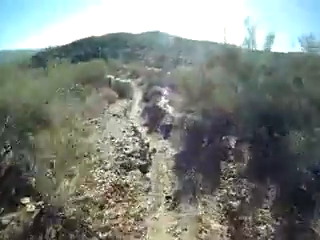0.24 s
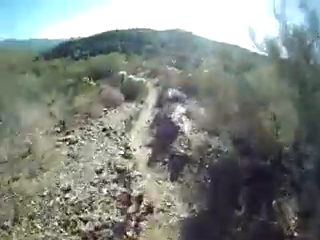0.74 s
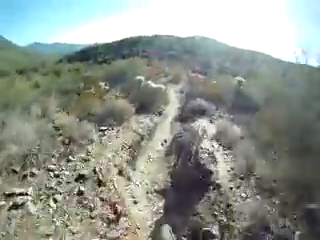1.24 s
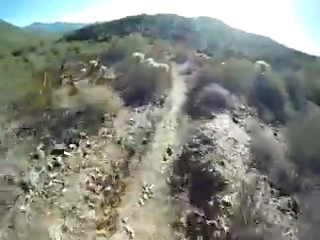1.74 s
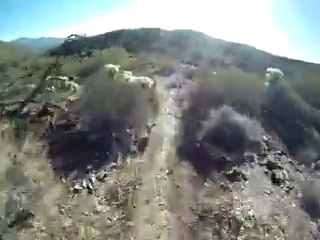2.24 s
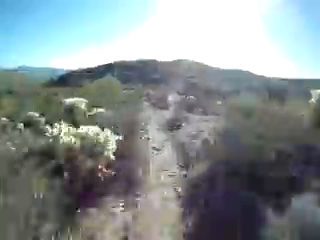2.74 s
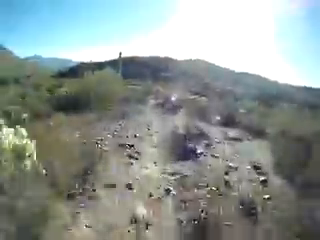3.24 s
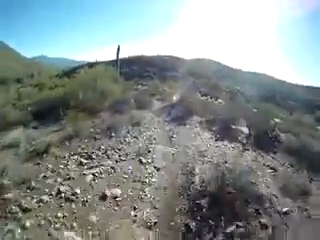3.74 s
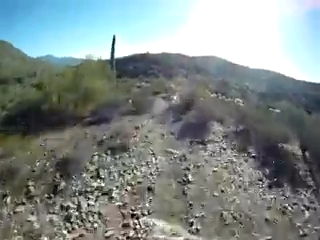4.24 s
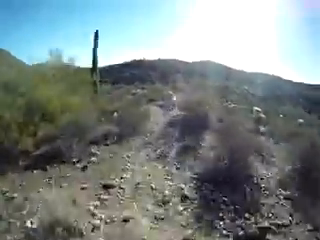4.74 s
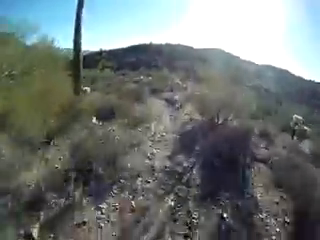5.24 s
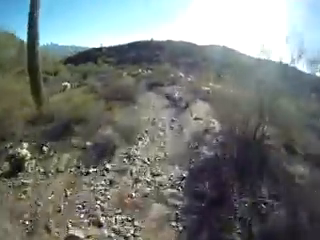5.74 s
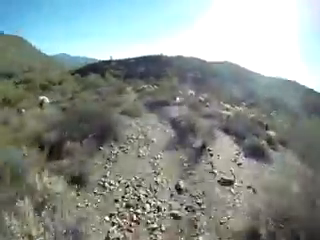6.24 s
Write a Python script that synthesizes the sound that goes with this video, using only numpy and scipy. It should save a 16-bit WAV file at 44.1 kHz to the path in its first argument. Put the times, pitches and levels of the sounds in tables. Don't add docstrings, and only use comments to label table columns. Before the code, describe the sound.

From inside a hard plastic camera case, a bike jolts along a rocky desert trail. Two heavy, boxy slams hit at about 0.1 and 0.3 s with low thumps and rumble, followed by a gritty scrape at 0.4 and clustered rattles at 0.8-0.9. Single hollow clacks come around 1.15-1.25, with dull scraping near 1.3 and a stronger knock and rub at 1.6. Lighter clacks follow at 2.1, 2.3 and 2.6, then only faint crunch and muffled rumble until 3.4. Knocks return at 3.6 and 3.8, with scrapes and bumps near 4.2. From 4.6 to 5.1 comes the most violent burst: overlapping slams, grinding and deep thuds, peaking at 4.9. Smaller scrapes and taps continue at 5.3-5.9, then dense, bright grinding and knocks from 6.0 to the end at 6.5. Everything is close, dry, crushed and grainy, briefly ducking after overloads.

```python
import sys
import numpy as np
from scipy import signal
from scipy.fft import rfft, irfft
from scipy.io import wavfile
from scipy.ndimage import uniform_filter1d, minimum_filter1d

SR = 44100
rng = np.random.default_rng(int(sys.argv[2]) if len(sys.argv) > 2 else 0)


def pcm_store(signal):
    levels = np.round(np.clip(np.atleast_2d(signal), -1, 1) * 32767)
    wavfile.write(sys.argv[1], SR, levels.astype(np.int16).T)


def volts(x):
    e = np.asarray(x, float) / 20
    return 10 ** e


N = 286209


def evened(x):
    return x / np.sqrt(np.mean(x ** 2) + 1e-20)


def lumps(seconds, depth_db):
    span = max(int(seconds * SR), 1)
    drift = uniform_filter1d(uniform_filter1d(rng.standard_normal(N), span), span)
    return volts(depth_db * evened(drift))


def coloured(points):
    f, db = np.transpose(points)
    hz = np.fft.rfftfreq(N, 1 / SR)
    gain = volts(np.interp(np.log(hz + 1), np.log(f + 1), db, left=-100, right=-100))
    return evened(irfft(rfft(rng.standard_normal(N)) * gain, N))


def ring(modes):
    t = np.arange(1500) / SR
    tap = 0
    for hz, width, db in modes:
        tap = tap + volts(db) * np.exp(-np.pi * width * t) * np.sin(2 * np.pi * hz * t)
    tap = signal.lfilter(*signal.butter(3, .75 * modes[0][0], "high", fs=SR), tap)
    return tap / abs(tap).max()


def grit(modes, per_s):
    taps = (rng.random(N) < per_s / SR) * rng.standard_normal(N)
    taps = taps * volts(2.5 * np.minimum(rng.exponential(1, N), 4))
    taps = taps * lumps(.008, 3.5)
    return evened(signal.oaconvolve(taps, ring(modes))[:N])


# (time [s], trail roughness [dB], wind buffeting [dB])
RIDE = [(0.0, -32.5, -10.5), (0.22, -43, -43), (0.25, -43, -23), (0.54, -44.5, -32), (1.53, -51.5, -40),
        (1.63, -55.5, -30.5), (2.02, -43, -32.5), (3.07, -48.5, -35.5), (3.13, -46, -46.5),
        (3.61, -44.5, -25.5), (3.69, -41.5, -38.5), (4.17, -37.5, -25.5), (4.54, -48.5, -40.5),
        (4.64, -47.5, -28), (4.84, -35.5, -25), (5.77, -41, -27.5), (6.27, -36, -22.5), (6.49, -30, -34.5)]
ROUGHNESS, BUFFETING = 1, 2


def ride(column, db, follows):
    rows = np.array(RIDE)
    control_db = np.interp(np.arange(N) / SR, rows[:, 0], rows[:, column])
    return volts(db + follows * (control_db + 44))


# (frequency [Hz], density [dB per Hz])
GUST = [(8.8, -30.5), (15, -1.5), (32, -9), (40, -3.5), (43, -17.5), (59, -19), (200, -38.5), (260, -49),
        (440, -120)]
# (frequency [Hz], density [dB per Hz])
SHUDDER = [(35, -112), (60, -10), (231, -11), (281, -12), (344, -16.5), (500, -17), (650, -43),
           (1100, -120)]


def rumble(wind_gain, shudder_gain):
    wind = evened(coloured(GUST) * lumps(.03, 2.5))
    shudder = evened(coloured(SHUDDER) * lumps(.015, 5))
    return wind_gain * wind + shudder_gain * shudder


# (frequency [Hz], width [Hz], level [dB])
TREAD = [(1980, 1500, -6), (2540, 500, 4.5)]


def tread():
    return ride(ROUGHNESS, -55.5, .6) * grit(TREAD, per_s=6000)


# (frequency [Hz], width [Hz], level [dB])
WALL = [(906, 430, 13.5), (1020, 280, 5), (1161, 180, 12.5), (1376, 340, 6.5)]
# (frequency [Hz], width [Hz], level [dB])
LID = [(1860, 400, 29), (2125, 99, 21), (2340, 96, -39.5)]
# (frequency [Hz], width [Hz], level [dB])
LATCH = [(2748, 120, -6.5), (3569, 240, 9), (4320, 400, 2), (4985, 540, 1.5), (5130, 230, -15)]


def crunch(body_gain, grit_gain):
    body = grit(WALL, per_s=5000) + volts(-1.0) * grit(LID, per_s=3500)
    return body_gain * evened(body) + grit_gain * grit(LATCH, per_s=4400)


# (time [s], peak [dB], pitch [Hz], length [s])
BUMPS = [(0.093, -8, 61, 0.0036), (0.272, -14.5, 33.3, 0.019), (0.584, -24.5, 87, 0.014),
         (0.809, -10, 46.7, 0.0089), (1.125, -21.5, 73, 0.023), (1.306, -30.5, 93, 0.034),
         (1.629, -11, 55.5, 0.012), (2.119, -17.5, 29.8, 0.011), (2.359, -20.5, 55, 0.018),
         (3.571, -17.5, 48, 0.03), (4.032, -15, 36.2, 0.011), (4.182, -10, 37.6, 0.012),
         (4.399, -25.5, 78.5, 0.026), (4.647, -7, 47.8, 0.022), (4.779, -1, 87.5, 0.005),
         (4.846, -2.5, 34.9, 0.019), (5.035, -12.5, 47.4, 0.017), (5.32, -7.5, 63, 0.013),
         (6.069, -17.5, 145.4, 0.017), (6.17, -16.5, 70.3, 0.036), (6.227, -10, 33.3, 0.013)]


def bumps():
    out = np.zeros(N + 4000)
    t = np.arange(4000) / SR
    for s, db, hz, length in BUMPS:
        u = t / np.clip(length, .003, .03)
        swing = u * np.exp(1 - u) * np.sin(2 * np.pi * hz * t * (1 - 1.8 * t))
        at = round(s * SR)
        out[at:at + 4000] += volts(db - 5.0) * swing
    return out[:N]


# (time [s], peak [dB], length [s])
DRAGS = [(0.086, -18.5, 0.022), (0.217, -9.5, 0.034), (.282, -8.5, 0.014), (0.585, -18.5, 0.025),
         (0.862, -13, 0.018), (0.885, -8.5, 0.016), (1.054, -27, 0.084), (1.312, -8, 0.029),
         (1.361, -10, 0.018), (1.581, -5.5, 0.034), (1.65, -8, 0.061), (1.842, -10, 0.02),
         (1.876, -16.5, 0.041), (2.167, -20.5, 0.013), (2.34, -26, 0.031), (2.376, -17, 0.022),
         (2.619, -12.5, 0.028), (3.487, -18, 0.019), (3.595, -5, 0.016), (3.889, -11, 0.012),
         (4.019, -13.5, 0.012), (4.407, -13.5, 0.044), (4.632, -10, 0.0046), (4.711, 0.5, 0.031),
         (5.206, -7.5, 0.0096), (5.369, -15.5, .044), (5.512, -9.5, .017), (5.815, -12.5, 0.019),
         (6.079, -1, 0.032), (6.348, -12, 0.033)]
# (time [s], peak [dB], length [s], sand [dB])
GRINDS = [(0.339, -13, 0.034, -12), (0.412, -5, 0.027, -17), (.811, -6, 0.025, -5),
          (.821, -10.5, 0.012, 3.5), (.977, -24.5, 0.042, -15), (1.545, -18, .018, 1.5),
          (1.629, -13.5, 0.033, -15.5), (2.08, -27, 0.017, -11.5), (2.46, -34, 0.028, -11),
          (2.709, -31.5, 0.051, -4), (3.392, -16, 0.072, -8.5), (3.564, -16, 0.022, -13),
          (3.61, -11, 0.016, 4), (4.174, -17, 0.034, -14), (4.231, -11.5, 0.025, -6.5),
          (4.642, -3, 0.032, -4.5), (4.783, -7, 0.018, -1.5), (4.846, -5.5, 0.029, -7),
          (4.966, -13.5, 0.026, -11.5), (5.04, -7.5, .026, -18), (5.083, -5, 0.017, -10.5),
          (5.321, -10, 0.03, -4), (5.664, -19.5, 0.041, -17), (5.88, -11, 0.036, -3.5),
          (6.029, -10, 0.04, -7.5), (6.142, -6.5, 0.04, -8), (6.217, 1, 0.041, -13.5),
          (6.284, -7, 0.028, -6), (6.433, -2.8, 0.021, -6), (6.472, -16, 0.0062, 4)]


def drag():
    gains = np.zeros((2, N + 5000))
    lead_s = .006
    t = np.arange(5000) / SR - lead_s
    dull = [(*row, -19) for row in DRAGS]
    for s, db, length, sand_db in dull + list(GRINDS):
        side_s = np.where(t < 0, .003, np.clip(length, .006, .05))
        shape = np.exp(-(t / side_s) ** 2)
        at = round((s - lead_s) * SR)
        gains[:, at:at + 5000] += volts(db - 15.0 + np.array([[0], [sand_db]])) * shape
    return gains[:, :N]


# (frequency [Hz], width [Hz], level [dB])
THUD = [(98, 140, 7), (242.4, 120, -8.5), (419, 130, -9.5)]
# (time [s], strength [dB], lean from wall to lid [dB])
SLAMS = [(.102, -1, -0.5), (.291, -4.5, -4.8), (.629, -16, -5), (.812, -15, -3.5), (.882, -12, -2.5),
         (1.139, -12.5, 4), (1.252, -12, 4.5), (1.583, -7, 7), (2.125, -9, 5.5), (2.268, -10.5, 8.5),
         (2.615, -11, 5), (3.379, -11, 5.5), (3.604, -11, 5), (3.831, -10.5, 6), (4.612, -12, 9),
         (4.653, -5.5, -5.5), (4.718, -10.5, 10.5), (4.786, -5, -2.5), (4.843, -9, -8.5), (4.852, -14, 3),
         (4.894, 1.5, -3), (5.14, -19, -5), (5.515, -17.5, 5.5), (5.82, -20.5, 3), (6.038, -12, -5.5),
         (6.088, -24.5, 11.5), (6.217, -14.5, -0.5), (6.224, -9.5, 3.5), (6.293, -10.5, -1), (6.436, -7, 1)]
# (time [s], strength [dB], lean from wall to lid [dB])
TAPS = [(.221, -17, -10), (.399, -19.5, -3), (.621, -34, 2), (2.243, -36, 6), (1.174, -27, -4.5),
        (1.323, -33, 8.5), (1.365, -17.5, 0), (1.568, -24, 5), (1.633, -12, -16), (1.855, -29, -16),
        (2.019, -29, -11), (2.167, -27, -3.5), (2.475, -29, -6), (2.567, -29, -2), (3.417, -24.5, -2.5),
        (4.006, -25.5, -6), (4.105, -18, -13), (4.126, -23, 1), (4.186, -34, 6.5), (4.254, -23.5, -2.5),
        (4.344, -31.5, -1), (4.41, -19.5, -6.5), (4.964, -43, -2), (5.046, -20, -11), (5.208, -19.5, -36),
        (5.328, -20, -14), (5.365, -14.5, -7), (5.587, -43, 17), (5.883, -14, -32), (6.36, -22.5, 8)]
# (time [s], strength [dB], lean from wall to lid [dB])
TICKS = [(.175, -43, 11), (.19, -35.5, 8), (.348, -28.5, 5), (.418, -29.5, -3), (.437, -21.5, -1),
         (.587, -32.5, -3), (.826, -25, 8), (1.657, -15.5, -9), (1.667, -19.5, 4), (2.087, -31, -2),
         (2.14, -32.5, 13), (2.491, -38, 11), (2.656, -21.5, 0), (3.389, -29.5, 2), (3.702, -28, 6),
         (3.841, -25.5, 6.5), (3.878, -24, 4.5), (4.444, -25.5, -3.5), (4.97, -27, 9), (5.079, -24.5, -7),
         (5.09, -19, 2.5), (5.242, -55, 15), (5.384, -21.5, -0.5), (5.661, -31.5, -3), (5.67, -46, -15),
         (5.828, -41, 8.5), (5.935, -25.5, 4), (6.045, -25, 8.5), (6.154, -18.5, -1.5), (6.238, -46, 11)]


def knocks():
    # (latch share [dB], chatter length [s])
    kinds = [(SLAMS, (-10.5, 0.0039)), (TAPS, (-3.5, 0.0044)), (TICKS, (6.7, 0.0044))]
    rows = [tuple(row) + kind for table, kind in kinds for row in table]
    blows, pushes = np.zeros((3, N + 2000)), np.zeros(N)
    lead_s = .002
    t = np.arange(2000) / SR - lead_s
    for s, peak_db, lean_db, latch_db, length in rows:
        rough = rng.standard_normal((4, 2000))
        share_db = np.array([0, lean_db, latch_db + lean_db / 2])
        dying = (t / np.clip(length, .0003, .008)) ** 2
        swell = np.exp(np.where(t < 0, t / .0006, -dying))
        uneven = volts(3.5 * evened(uniform_filter1d(rough[3], 70)))
        chatter = .22 * rough[:3] * swell * uneven
        chatter[:, 88:94] -= 1.2 * np.hanning(6)
        chatter /= np.sqrt(np.sum(chatter[:, :350] ** 2, axis=1, keepdims=True))
        at = round((s - lead_s) * SR)
        blows[:, at:at + 2000] += volts(peak_db + 7.0 + share_db)[:, None] * chatter
        pushes[at] = volts(peak_db - 7.0 + 3.9 * rough[3, 0])
    rung = sum(signal.oaconvolve(blow, ring(part))[:N] for blow, part in zip(blows, (WALL, LID, LATCH)))
    thud = uniform_filter1d(signal.oaconvolve(pushes, ring(THUD))[:N], 40)
    return rung + thud


def scene():
    body, sharp = drag()
    shudder_gain = ride(ROUGHNESS, -48.5, 1) + volts(-7.0) * body
    shake = volts(-4) * uniform_filter1d(body, int(.04 * SR))
    wind_gain = ride(BUFFETING, -44.5, 0.87) + shake
    body_gain = ride(ROUGHNESS, -44, 0.96) + body
    grit_gain = ride(ROUGHNESS, -58, 0.91) + sharp
    background = rumble(wind_gain, shudder_gain) + tread()
    return (background + crunch(body_gain, grit_gain) + bumps() + knocks())[None]


def ducked(x):
    duck_from_db, duck_share, recover_db_per_s = -15, 0.4, 246
    power_db = 10 * np.log10(abs(uniform_filter1d(x ** 2, 200)) + 1e-12)
    fall = np.arange(len(x)) * recover_db_per_s / SR
    held_db = np.maximum.accumulate(power_db + fall) - fall
    over_db = np.maximum(held_db - duck_from_db, 0)
    return x / volts(duck_share * np.roll(uniform_filter1d(over_db, 120), 220))


def sampled_and_held(x):
    slow = np.clip(signal.resample_poly(x, 40, 147), -.97, .97)
    held = signal.resample_poly(np.repeat(slow, 4), 147, 160)[:N]
    held = np.pad(held, (0, N - len(held)))
    edge = signal.firwin(255, 16250, window=("kaiser", 7), fs=SR)
    return signal.oaconvolve(held, edge, "same")


# (frequency [Hz], signal over the rounding step [dB])
COARSE = [(300, 22), (1500, 12), (2600, 6), (3500, -2), (4500, -6.5), (6000, -10), (7500, -7.5),
          (10000, -8.3), (12000, -7), (13000, -7.5), (15300, -7.5), (15600, -14), (16000, -30)]


def rounded(x, size, count, extra_db):
    n, k = np.arange(2 * size), np.arange(size)
    basis = np.cos(np.pi / size * np.outer(n + .5 + size / 2, k + .5)) * np.sqrt(2 / size)
    basis *= np.sin(np.pi * (n[:, None] + .5) / (2 * size))
    blocks = np.pad(x, (size, 2 * size - N % size)).reshape(-1, size)
    lines = np.hstack([blocks[:-1], blocks[1:]]) @ basis
    lines = lines[:, :size // count * count]
    power = (lines ** 2).reshape(len(lines), -1, count).mean(2) + 1e-14
    nearby = .7 * power + .3 * uniform_filter1d(power, 5, 1)
    mask_db = 10 * np.log10(nearby + volts(-90) * power.sum(1, keepdims=True))
    hz = (np.arange(power.shape[1]) + .5) * count * SR / (2 * size)
    fine_db = np.interp(hz, *np.transpose(COARSE)) + extra_db
    luck_db = 3.5 * rng.standard_normal(power.shape)
    step = np.repeat(volts(mask_db - fine_db + luck_db), count, 1)
    kept = np.sign(lines) * np.floor(abs(lines) / step + .4054) * step
    halves = kept @ basis[:, :kept.shape[1]].T
    return (halves[:-1, size:] + halves[1:, :size]).ravel()[:N]


def stored(x):
    sharp = uniform_filter1d(np.diff(x, prepend=0) ** 2, 128)
    jump = sharp > volts(40.) * np.roll(uniform_filter1d(sharp, 1024), 640)
    short = uniform_filter1d(1 - minimum_filter1d(1. - jump, 1400), 256)
    long_blocks = rounded((1 - short) * x, size=1024, count=24, extra_db=0)
    short_blocks = rounded(short * x, size=128, count=4, extra_db=3)
    return short_blocks + long_blocks


def band_limit(x):
    return signal.sosfilt(signal.butter(12, 16290, fs=SR, output="sos"), x)


def record(dry):
    held = sampled_and_held(ducked(dry[0]))
    mix = np.clip(stored(held), -1, 1)[None]
    return band_limit(mix)


dry = scene()
out = record(dry)
pcm_store(out)
```